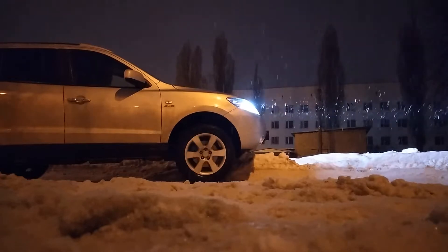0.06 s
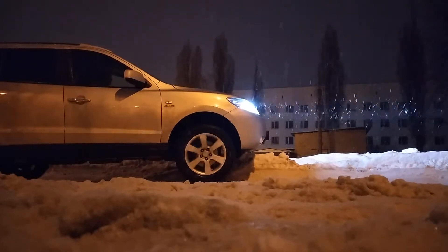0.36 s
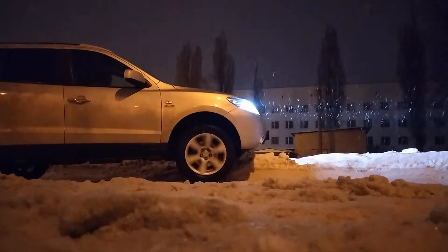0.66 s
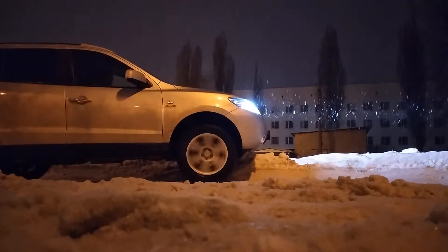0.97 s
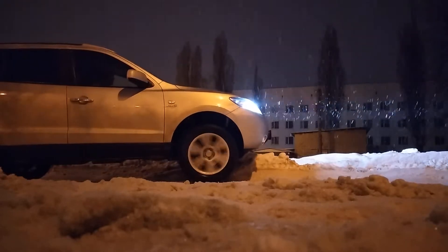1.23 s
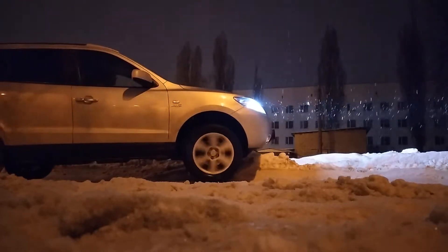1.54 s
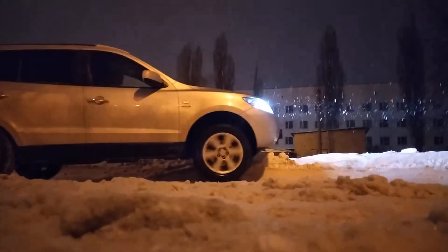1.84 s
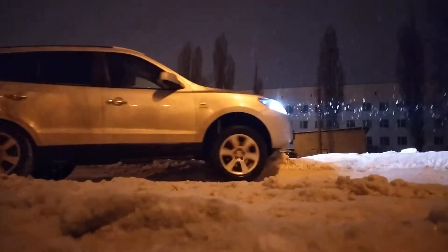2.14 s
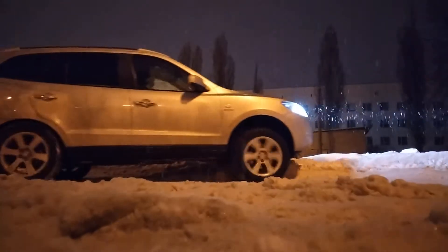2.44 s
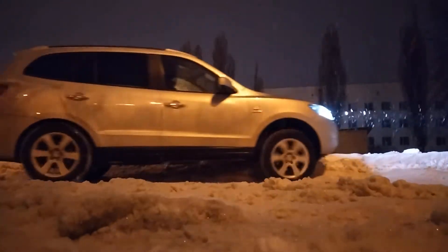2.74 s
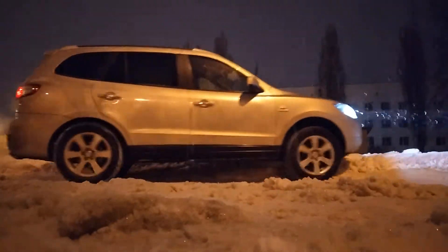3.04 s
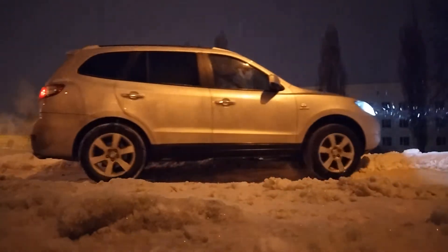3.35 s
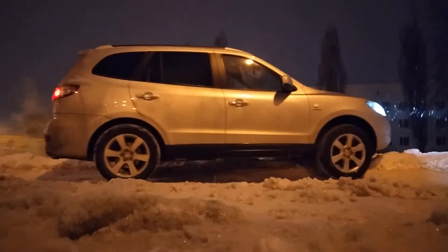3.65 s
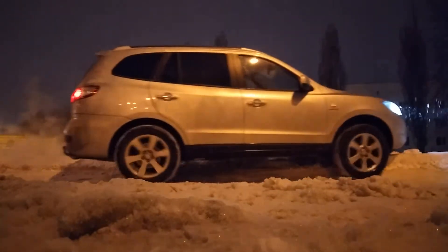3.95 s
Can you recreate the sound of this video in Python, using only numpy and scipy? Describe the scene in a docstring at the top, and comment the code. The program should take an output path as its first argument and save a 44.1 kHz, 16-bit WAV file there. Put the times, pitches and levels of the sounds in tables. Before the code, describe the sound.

A car engine revs up and holds, heard from beside a snowy track, with rumbling, groaning tyres and a thin hiss. It falls back to idle amid muffled snow crunches, then revs once more.

```python
"""An SUV claws through rutted snow a few metres away. Two ice crusts snap over the idle, then the engine
revs up and holds, booming and roaring under a thin recording hiss, while the tyres judder and groan.
Just after 2 s the revs sink back to idle; lumps of snow crunch under the tread and grit ticks on the body.
Near 2.9 s the treble cuts off abruptly; it returns as the engine revs again through more crunches.
The ruts rumble and a faint hum runs on underneath."""
import sys
import numpy as np
from scipy import signal
from scipy.fft import rfft, irfft, next_fast_len
from scipy.io import wavfile
from scipy.ndimage import uniform_filter1d

SR = 44100
rng = np.random.default_rng(int(sys.argv[2]) if len(sys.argv) > 2 else 0)


def generate_wav(sig):
    """Save sig (samples, or channels by samples) to the path in sys.argv[1] as 16-bit PCM at SR."""
    pcm = np.round(np.clip(np.atleast_2d(sig).T, -1, 1) * 32767).astype(np.int16)
    wavfile.write(sys.argv[1], SR, pcm)


N = 176400
T = np.arange(N) / SR
PADDED = next_fast_len(N + SR // 10)
HZ = np.fft.rfftfreq(PADDED, 1 / SR)
CHURN_DB, ICE_DECAY_S = 1.1, .004

# Revs and exhaust boom: t/s, firing rate/Hz, level/dB
REVS = [(.17, 27.53, -39.5), (.3, 30.06, -31.5), (.42, 33.08, -29.5), (.52, 42.38, -32),
        (.61, 53.04, -26.5), (.69, 66, -34), (.81, 76.76, -36), (1.02, 92.56, -35.5), (1.16, 97.77, -27.5),
        (1.5, 95.67, -29.5), (1.8, 96.77, -27.5), (2.06, 96.13, -29), (2.25, 92.46, -27),
        (2.46, 81.55, -43), (2.6, 69.35, -41.5), (3.03, 44.18, -33), (3.27, 31.88, -45),
        (3.48, 31.88, -37.5), (3.63, 47.16, -20), (3.7, 62.85, -25.5), (3.78, 77.02, -26),
        (3.9, 90.06, -37.5), (4, 99.63, -27.5)]
# Fixed narrow peaks, from the engine bay and underbody and from reflections off the ground nearby: f/Hz,
# boost/dB
FIXED_PEAKS = [(1367, 5.5), (1638, 6), (2023, 0.5), (2950, 4.5), (4608, 7.5), (7177, 5), (7947, 0)]
# Midrange EQ of the engine bay's rush and the ice cracks: f/Hz, level/dB
RUSH_EQ = [(600, -14.5), (900, 6), (1180, -1), (2100, 0.5), (2450, -5), (3100, -6), (4000, -14),
           (12000, -39.5)]
# Wheels rolling through the ruts: t/s, rumble level/dB, snow level/dB
ROLLING_LEVELS = [(.45, -40, -57.5), (.8, -38, -53), (1.05, -32, -42), (2.15, -34.5, -41.5),
                  (2.37, -26.5, -36), (2.6, -32, -41.5), (2.8, -39, -36), (2.92, -27, -41.5),
                  (2.98, -42, -47), (3.08, -37.5, -37.5), (3.25, -37, -44), (3.44, -36, -47.5),
                  (3.53, -42.5, -38), (3.7, -37.5, -41.5), (3.88, -28.5, -34), (4, -44.5, -33)]
# Muffled EQ of packing snow: f/Hz, level/dB
SNOW_EQ = [(50, -24), (150, -11.5), (240, 5), (600, -5), (800, -13.5), (1000, -26), (1300, -36),
           (2000, -44), (5000, -89)]


def amp(db):
    """Decibels to gain."""
    return 10 ** (np.asarray(db) / 20)


def unit(x):
    """Scales to rms 1."""
    return x / np.sqrt(np.mean(x ** 2) + 1e-20)


def curve(table, column=1):
    """One column of a time table at every sample."""
    rows = np.array(table)
    return np.interp(T, rows[:, 0], rows[:, column])


def spectrum(table, column=1):
    """One column of a frequency table at every bin."""
    rows = np.array(table)
    return np.interp(np.log(HZ + 1), np.log(rows[:, 0]), rows[:, column])


def colour(x, eq, peaks=(), width_hz=30):
    """Filters by an EQ curve plus narrow resonances."""
    peaks_db = sum(boost / (1 + (2 * (HZ - hz) / width_hz) ** 2) for hz, boost in peaks)
    return irfft(rfft(x, PADDED) * amp(spectrum(eq) + peaks_db), PADDED)[..., :N]


def noise(eq, peaks=()):
    """Two unrelated channels of coloured noise, rms 1."""
    return unit(colour(rng.standard_normal((2, N)), eq, peaks))


def drift(rate_hz):
    """Smooth random motion, rms 1."""
    knots = np.arange(-1, T[-1] * rate_hz + 1)
    positions = knots + rng.random()
    return unit(np.interp(T * rate_hz, positions, rng.standard_normal(N // 20)[:len(knots)]))


def add(mix, start_s, sound):
    """Mixes a sound in at a time."""
    part = mix[..., max(round(start_s * SR), 0):][..., :sound.shape[-1]]
    part += sound[..., :part.shape[-1]]


def bursts(events, decay_s):
    """An envelope that swells quickly and dies away at each event."""
    out, age = np.zeros(N), T[:SR // 10] / decay_s
    for t, db in events:
        add(out, t - decay_s, amp(db) * age ** 2 * np.exp(-age))
    return out


def sizzle(x, depth_db=1.3):
    """Adds short random surges, each in its own band."""
    frames = signal.stft(x)[2]
    patches = uniform_filter1d(rng.standard_normal(frames.shape[1:]), size=10, axis=0)
    patches = uniform_filter1d(patches, size=10)
    return signal.istft(frames * amp(depth_db * unit(patches)))[1][:, :N]


def spread(pair):
    """Two unrelated signals, as mid and side, become left and right: mono bass, wide treble."""
    # Stereo image: f/Hz, left-right likeness, left minus right/dB
    image = [(101.4, 0.99, 1.05), (274, 0.97, 0.2), (654, 0.98, 2), (1210, 0.66, -3), (2020, 0.5, 0.5),
             (4990, 0.25, 2.5), (8400, .05, 11), (11680, .3, -18)]
    likeness = np.clip(spectrum(image), -1, 1)
    lean = amp(spectrum(image, column=2) / 2)
    mid, side = rfft(pair, PADDED) * np.sqrt([(1 + likeness) / 2, (1 - likeness) / 2])
    return irfft(np.array([(mid + side) * lean, (mid - side) / lean]), PADDED)[:, :N]


def exhaust(firings, fade_db=3.5):
    """The exhaust booms and churns at the firing rate; neighbouring partials come and go."""
    # Exhaust partials: multiple of the firing rate, level against the boom/dB
    partials = [(.5, -22), (1, 0), (1.5, -17), (2, -18.5), (3.5, -16.5), (4, -23)]
    boom = np.zeros(N)
    for order, db in partials:
        swing_db = CHURN_DB * drift(15) if order == 1 else fade_db * drift(8)
        boom += amp(db + swing_db) * np.sin(2 * np.pi * (order * firings + rng.random()))
    return np.sqrt(2) * amp(curve(REVS, column=2)) * boom


def engine_roar(firings, fade_db=3.5, waver_rad=.5, tonal_share=.87):
    """Four unequal cylinders give a comb of orders that fade in and out, over intake air."""
    # Swell of the roar: t/s, level/dB
    levels = [(.5, -56.5), (.6, -43), (.72, -39), (.87, -32.5), (1.17, -30.5), (1.3, -34.5), (2.1, -36),
              (2.4, -46), (2.6, -34.5), (2.85, -43.5), (2.97, -58), (3.4, -45.5), (3.65, -52), (3.82, -38),
              (4, -35)]
    # Low-mid body of the roar: f/Hz, level/dB
    eq = [(40, -15), (130, -3), (200, 4), (270, -5), (370, -1), (520, -2.5), (680, -4.5), (850, -11.5),
          (1250, -36), (4000, -66)]
    comb = np.zeros(N)
    for order in np.arange(5, 48) / 4:
        db = -6 if order % .5 else 0  # weaker between the crank's harmonics
        gain = amp(db + fade_db * np.minimum(drift(7), 1.5))
        phase = 2 * np.pi * (order * firings + rng.random())
        comb += gain * np.sin(phase + waver_rad * drift(10))
    roar = noise(eq, FIXED_PEAKS)
    growl = unit(colour(comb, eq, FIXED_PEAKS))
    roar[0] = np.sqrt(1 - tonal_share) * roar[0] + np.sqrt(tonal_share) * growl  # mid channel only
    return roar * amp(curve(levels))


def rush_and_hiss(firings, grain_db=.3, throb_depth=.14):
    """The engine bay's gritty rush and a thin, throbbing high recording hiss."""
    # Treble levels, cut off near 2.9 s and returning with the revs: t/s, rush level/dB, hiss level/dB
    levels = [(.46, -91, -90), (.59, -70.5, -81.5), (.64, -61.5, -63), (.87, -49, -58.5), (1.17, -47, -56),
              (1.33, -50.5, -55), (2.0, -49, -54), (2.42, -56, -57.5), (2.55, -50.5, -64),
              (2.899, -60.5, -70), (2.908, -78.5, -91), (3.35, -91, -93.5), (3.62, -85, -88),
              (3.67, -67.5, -64.5), (3.82, -57, -57), (4, -54, -55)]
    # Bright EQ of the hiss: f/Hz, level/dB
    hiss_eq = [(1000, -13.5), (3000, 6.5), (7000, 1), (8100, 4), (9600, -2), (11600, -2), (13000, -20),
               (15600, -21.5)]
    grit = rng.standard_normal((2, N)) * amp(grain_db * drift(500) + CHURN_DB * drift(35))
    throbbing = rng.standard_normal((2, N)) * (1 + throb_depth * np.cos(np.pi * firings))
    rush = unit(colour(sizzle(grit), RUSH_EQ, FIXED_PEAKS))
    hiss = unit(colour(sizzle(throbbing), hiss_eq, FIXED_PEAKS))
    return rush * amp(curve(levels)) + hiss * amp(curve(levels, column=2))


def tyre_judders(waver_depth=.04124):
    """A tyre sticks and slips in short wavering groans."""
    # Judders in the ruts: t/s, length/s, f/Hz, level/dB
    groans = [(0.82, 0.35, 67, -29), (0.815, 0.29, 205, -37), (1.02, 0.354, 48, -31),
              (0.984, .32, 495, -37), (1.288, 0.47, 368, -39.5), (2.31, 0.35, 191, -35.5),
              (2.774, 0.21, 240, -37.5), (2.92, .2, 66, -28), (3.79, 0.16, 255, -33)]
    out, waver = np.zeros(N), 1 + waver_depth * drift(26.46)
    for t, length, hz, db in groans:
        swell = np.sin(np.pi * np.clip((T - t) / length, 0, 1))
        out += np.sqrt(2) * amp(db) * swell * np.sin(2 * np.pi * np.cumsum(hz * waver) / SR)
    return out


def rut_rumble():
    """Wheels and body shake over the ruts."""
    # Low-end weight of the rumble: f/Hz, level/dB
    eq = [(10, -21), (28, 1), (50, -3), (80, -2), (175, -9), (260, -19.5), (4000, -128)]
    return noise(eq) * amp(curve(ROLLING_LEVELS))


def packing_snow(grains_per_s=900, spread_db=1.5):
    """Snow packs under the tread in many small muffled fractures."""
    sizes = amp(spread_db * np.minimum(rng.exponential(1, (2, N)), 4))
    clicks = sizes * rng.choice([-1, 1], (2, N)) * (rng.random((2, N)) < grains_per_s / SR)
    level_db = curve(ROLLING_LEVELS, column=2) + CHURN_DB * drift(35)
    return unit(colour(clicks, SNOW_EQ)) * amp(level_db)


def snow_crunches(decay_s=.0024):
    """Each lump gives way with a dull knock and a quick burst of fractures."""
    # Collapsing lumps of snow: t/s, level/dB
    lumps = [(2.329, -17.5), (2.4, -21), (2.534, -20), (3.499, -19.5), (3.539, -21), (3.56, -20),
             (3.604, -20.5), (3.737, -18.5), (3.814, -18.5), (3.88, -15.5)]
    impulses = np.zeros(N)
    for t, db in lumps:
        add(impulses, t + decay_s, amp([db]))
    impulse_peak = irfft(amp(spectrum(SNOW_EQ)))[0]
    knocks = colour(impulses, SNOW_EQ) / impulse_peak
    fractures = bursts(lumps, decay_s) * noise(SNOW_EQ)
    return knocks / 2 + fractures / 4


def ice_snaps(ring_hz=734):
    """Crusts of ice snap with a small crumbling crack and a hollow ring."""
    # Snapping crusts: t/s, level/dB
    snaps = [(.082, -60.5), (.284, -51.5)]
    crack = amp(-24) * noise(RUSH_EQ)
    ring = np.sin(2 * np.pi * ring_hz * T + drift(300))
    return 2 * bursts(snaps, ICE_DECAY_S) * (ring + crack)


def grit_ticks():
    """Icy grit, flung against the body, lands in bright little ticks."""
    # Grit hits: t/s, level/dB
    hits = [(1.612, -55), (2.472, -51), (2.682, -53.5), (3.533, -75)]
    # Thin, bright EQ of a tick: f/Hz, level/dB
    eq = [(1500, -14), (4000, 0), (9000, -32)]
    return bursts(hits, ICE_DECAY_S) * noise(eq)


def fan_hum():
    """A faint steady hum, likely the cooling fan."""
    # Tones of the hum: f/Hz, level/dB
    tones = [(134.6, -44.5), (366, -62)]
    waver = 1 + .00479 * drift(10)
    return sum(amp(db) * np.sqrt(2) * np.sin(2 * np.pi * np.cumsum(hz * waver) / SR) for hz, db in tones)


def scene():
    """Heard from the side of the track: textures spread in stereo; boom, judders and hum dead centre."""
    firing_hz = curve(REVS) * (1 + .00587 * drift(15.6))
    firings = np.cumsum(firing_hz) / SR
    wide = engine_roar(firings) + rush_and_hiss(firings)
    wide += rut_rumble() + packing_snow() + snow_crunches() + ice_snaps() + grit_ticks()
    return spread(wide) + exhaust(firings) + tyre_judders() + fan_hum()


def record(dry, fade_s=.006, cutoff_hz=15700):
    """A quick fade-in, then a steep high cut."""
    fade_in = np.sin(np.pi / 2 * np.minimum(T / fade_s, 1)) ** 2
    high_cut = signal.firwin(511, cutoff_hz, window=("kaiser", 9), fs=SR)
    return signal.oaconvolve(dry * fade_in, high_cut[None], "same")


dry = scene()
out = record(dry)
generate_wav(out)
```